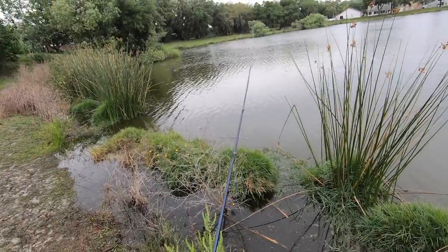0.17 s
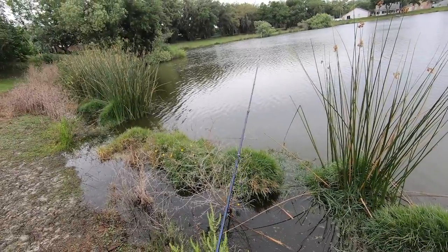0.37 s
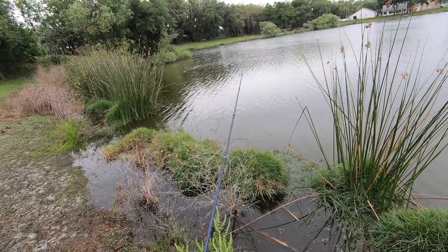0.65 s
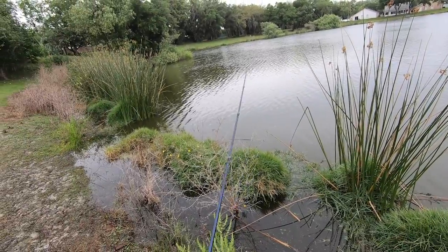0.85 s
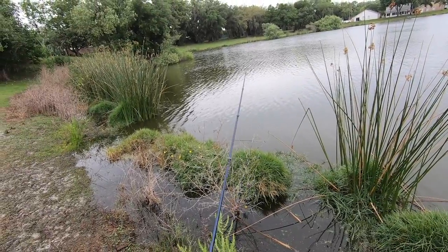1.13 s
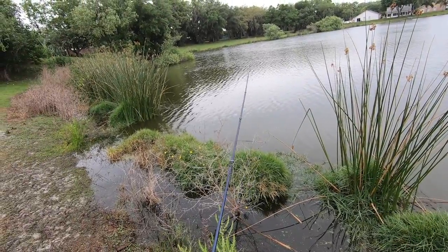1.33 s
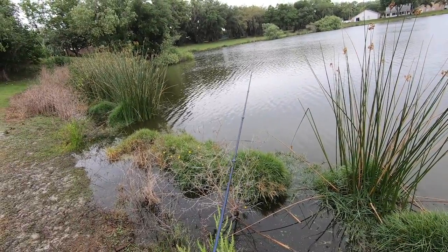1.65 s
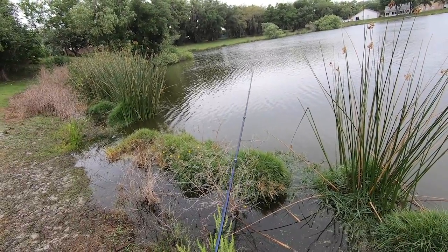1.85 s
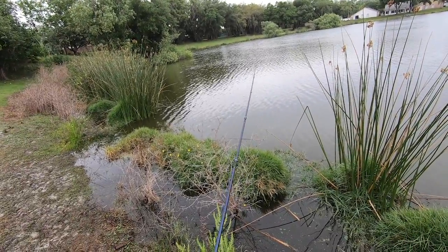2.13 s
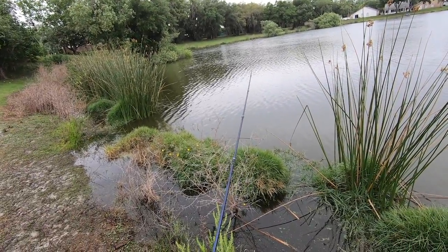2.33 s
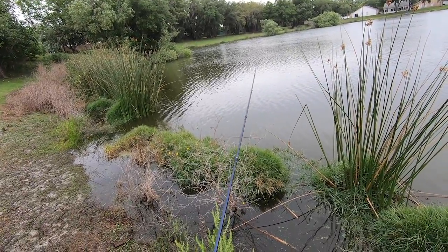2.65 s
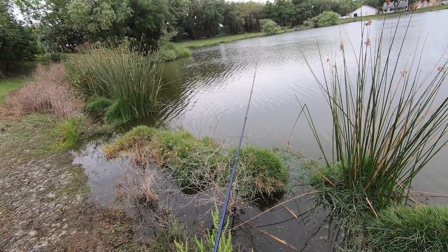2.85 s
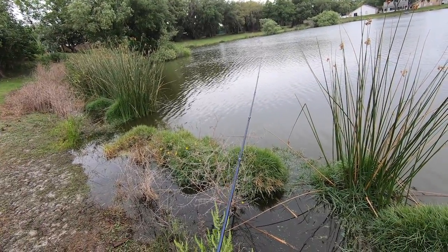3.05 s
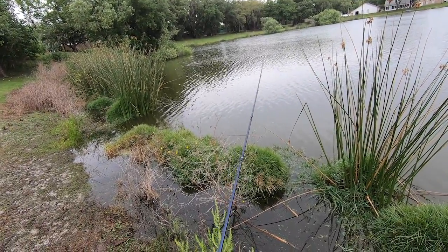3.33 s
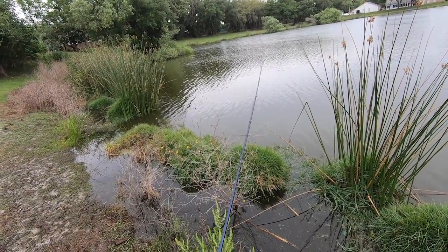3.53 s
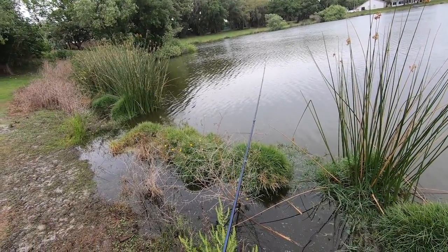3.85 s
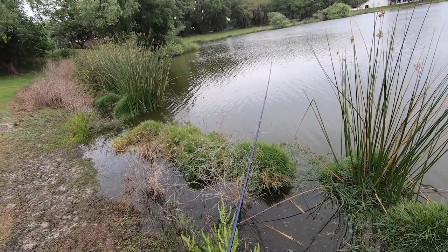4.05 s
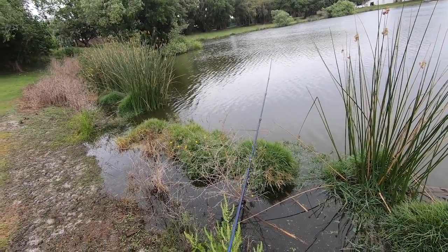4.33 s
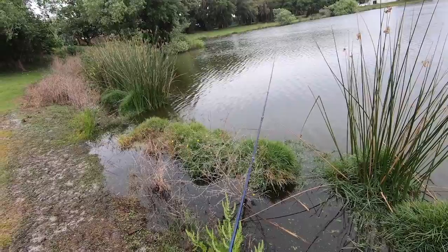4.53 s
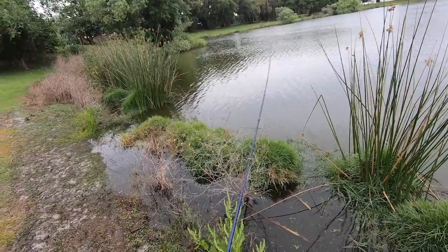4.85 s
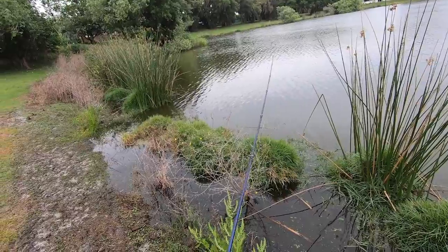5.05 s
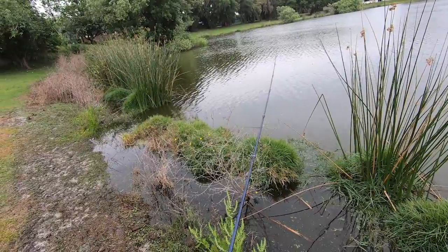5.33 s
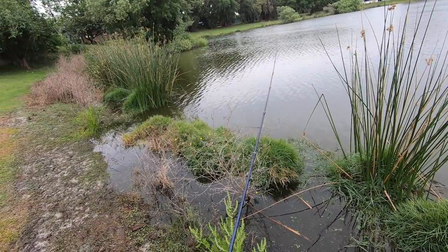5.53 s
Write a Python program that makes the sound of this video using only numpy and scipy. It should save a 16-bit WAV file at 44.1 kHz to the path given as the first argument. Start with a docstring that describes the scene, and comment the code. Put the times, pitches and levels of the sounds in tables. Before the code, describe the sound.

Outdoors at a quiet pond, a dull wash of breeze in trees lies over a faint distant engine. A cricket trills in regular short pulses throughout, above a very faint insect chorus. Small birds give slurred chirps, thin high whistles and quick twitters, mostly in the first four seconds. Midway a low gust buffets the open stereo microphone, heavier on the left, then fades, leaving breeze, engine rumble and cricket.

```python
"""The bank of a pond on a breezy day: a far engine drones under the wash of air in the trees.
One gust buffets the microphone, mostly its left port; a cricket trills steadily in the grass.
Small birds whistle and twitter around the water, and dry reeds tick now and then. Wind, leaves
and far calls are filtered noise, the engine harmonics plus noise, near birds and cricket sines."""
import sys
import numpy as np
from scipy import signal
from scipy.fft import rfft, irfft, next_fast_len
from scipy.io import wavfile
from scipy.ndimage import map_coordinates

SR = 44100
rng = np.random.default_rng(int(sys.argv[2]) if len(sys.argv) > 2 else 0)


def transcribe(u):
    """Save the signal u as a 16-bit wav file named by the first command-line argument.

    u: samples, shape (n,) or (channels, n), limited to [-1, 1]; the rate is SR.
    q: integer samples, one column per channel.
    """
    v = np.clip(np.atleast_2d(u).T, -1, 1)
    q = np.round(v * 32767).astype(np.int16)
    wavfile.write(sys.argv[1], SR, q)


N = 250488

# In every table, side/dB is the left minus right level difference.
# wind spectrum: [f/Hz, density/dB per Hz]
WIND_SPECTRUM = [(10, -17), (18, -6.5), (28, 0.5), (50, -2), (80, -6), (130, -16.5), (200, -23.5),
                 (350, -46), (700, -58.5)]
# puffs that make up the gust: [t/s, length/s, level/dB, side/dB]
GUST_PUFFS = [(2.672, 0.55, -36.5, 1.5), (3.326, 0.16, -23, 1.5), (3.744, .33, -31, 9),
              (4.299, 0.05, -35, 13)]
PUFF_ATTACK_S, PUFF_RELEASE_DB_PER_S, CALM_DB = 0.064, 81, -52

# far engine, whose drone gives way to rumble: [t/s, rumble gain/dB, exhaust drone gain/dB]
ENGINE_LEVELS = [(0, -40, -36.3), (2.4, -39.5, -38), (2.9, -36, -42), (5.68, -37, -44.5)]
FIRING_HZ = 31.59
# engine lines: [multiple of the firing rate, level/dB against its band]
RUMBLE_LINES = [(2, -7), (3, -14.5)]
# [multiple of the firing rate, level/dB against its band]
DRONE_LINES = [(6, -14), (7, -11), (8, -11), (9, -17), (10, -20.5), (11.2, -25), (12.6, -27)]
# rumble noise spectrum: [f/Hz, density/dB per Hz]
RUMBLE_SPECTRUM = [(12, -32.5), (25, -11), (42, -1.5), (65, 3), (80, -0.5), (90, -7.5), (100, -0.5),
                   (115, -2), (135, -4), (160, -10.5), (220, -21.5), (400, -52.5)]
# drone noise spectrum: [f/Hz, density/dB per Hz]
DRONE_SPECTRUM = [(100, -19), (160, -0.5), (200, 2), (260, -1), (290, -2), (335, -12.5), (420, -16),
                  (700, -31.5)]

# breeze in the trees, before the gains in trees(): [t/s, wash level/dB, leaf hiss level/dB]
BREEZE_LEVELS = [(0.0, -48, -75.5), (0.3, -47.5, -78), (1.93, -48.5, -80), (3.99, -49.5, -78),
                 (4.26, -50, -79), (5.68, -48.5, -76.5)]
# wash spectrum: [f/Hz, density/dB per Hz]
WASH_SPECTRUM = [(300, 0.5), (370, -1), (450, -2.5), (600, -3), (800, -2), (1120, -4.5), (1450, -9),
                 (1950, -15), (2400, -19), (3100, -20), (4000, -25), (5000, -28)]
# leaf hiss spectrum: [f/Hz, density/dB per Hz]
LEAF_SPECTRUM = [(2500, -14), (3500, -1), (4700, 1), (6200, 2), (7500, -1.5), (8300, -1.5), (9600, 0.5),
                 (10300, -6), (11000, -11.5), (12000, -25)]
# phase by which the left port leads: [f/Hz, phase/rad]
PORT_LEAD = [(300, 0), (550, -1), (780, 0), (1120, -0.3), (1500, 0.17), (2200, 1), (4000, 0)]
# correlation between the ports: [f/Hz, likeness -1 to 1]
PORT_LIKENESS = [(300, 0.92), (600, 0.87), (1060, 0.24), (1900, 0.59), (3300, 0.7), (5900, -0.066),
                 (10500, -0.22)]
# level difference between the ports: [f/Hz, side/dB]
PORT_BALANCE = [(300, -0.5), (600, -3.5), (1000, -10.5), (1400, -9.5), (1900, -4), (3300, -1.5), (4500, 0),
                (7500, 0.5), (9500, 5), (11000, 1.5)]

# the cricket's tempo, hurrying once: [t/s, chirps per s]
CRICKET_TEMPO = [(0, 4.44), (1.3, 4.46), (1.75, 4.68), (2.5, 4.37), (5.68, 4.36)]
FIRST_CHIRP_S, CHIRP_S, CHIRP_DB = -0.015, 0.146, -61.5
# one wing stroke: Gaussian width as a share of its cycle, and fall in pitch over the cycle
STROKE_WIDTH, STROKE_SWEEP_HZ = 0.33, 650

# slurred bird notes, the row at 0.784 s being a softer echo of the long falling whistle at 0.774 s; a positive
# bend glides late, a negative one early: [t/s, length/s, first f/Hz, last f/Hz, bend, level/dB, side/dB,
# distance 0-1]
SLURRED_NOTES = [ (0.182, .058, 4040, 3100, .1, -64, -13, .4), (.21, .016, 7300, 6650, -1.1, -68, -5, .2),
                 (.314, .092, 4070, 3000, -.5, -66, 1, .4), (0.784, .052, 4020, 3250, -1, -69, -1, .5),
                 (0.774, .245, 4930, 2180, -1.3, -64.5, 3, .35),
                 (1.351, 0.086, 3750, 2920, -0.5, -69, 2, .35), (1.869, .095, 3710, 3000, 1.5, -62, 0, .45),
                 (1.98, .094, 2990, 2850, -2, -66, 0, .55), (2.19, .105, 3710, 3000, 1.5, -60.5, 2, 0.2),
                 (2.326, 0.065, 3790, 2920, 0.6, -53.5, -17.5, .2),
                 (2.631, 0.11, 2900, 3320, -4, -61, -1, 0.41),
                 (2.937, .12, 3100, 3480, 3.5, -60.5, -1, 0.3)]
# runs of arched pips; their tops lie alternately below and above the centre:
# [t/s, length/s, interval/s, centre of tops f/Hz, level/dB, distance 0-1]
TWITTER_RUNS = [ (0.4, .115, .033, 7570, -69, .2), (1.2, .115, .033, 7150, -79.5, 0.7),
                (1.478, .115, .033, 7450, -77, .7), (2.212, .14, .031, 7250, -74, 0.5),
                (2.603, .25, .055, 7340, -60.5, 0.3), (3.04, .215, .033, 7450, -78, .8),
                (3.32, .18, .033, 7100, -79, .9), (3.609, .15, .033, 7300, -75, .9),
                (4.219, .05, .033, 7900, -72.5, .9), (5.0, .115, .033, 7600, -81, .9)]
PIP_S, PIP_ARCH_HZ, PIP_SEESAW_HZ, TWITTER_SWELL_DB = 0.017, 580, 150, 8.5
# lead and relative level of the softer grace pip before each pip
GRACE_S, GRACE_DB = 0.018, -9
# thin whistles that scoop up to a held pitch:
# [t/s, length/s, held f/Hz, scoop depth/Hz, level/dB, distance 0-1]
WHISTLE_NOTES = [(.375, 0.17, 7010, 150, -70.5, 0.4), (2.114, 0.23, 6800, 450, -74, 0.6),
                 (3.408, 0.33, 6720, 450, -78, .6), (3.76, 0.22, 6870, 750, -67.5, 0.33)]
SCOOP_S = 0.033
# far calls, blurred by distance: [t/s, length/s, f/Hz, width/Hz, level/dB, side/dB]
BLURRED_CALLS = [(0.102, 0.7, 1136, 90, -53.5, -8), (0.152, 0.46, 3380, 1400, -63.5, -4.5),
                 (2.172, 0.39, 3280, 1100, -64.5, -4), (3.252, .2, 1060, 110, -59, -11),
                 (5.273, .24, 3900, 900, -70.5, -4)]

# dry reeds touching: [t/s, peak level/dB, side/dB]
REED_TICKS = [(.7223, -58, 5), (3.8053, -56, 0), (4.0971, -63, 6)]
# far insect chorus: [f/Hz, width/Hz, level/dB]
CHORUS_BANDS = [(5040, 230, -76.5), (5426, 210, -76), (5870, 180, -78.5)]
# scatter from the wooded bank: decay time, and level of the cricket's echo
BANK_T60_S, BANK_ECHO_DB = 0.55, -8
CUTOFF_HZ = 11200


def from_db(db):
    """Amplitude gain is ten to the power of a twentieth of the decibels."""
    return 10 ** (np.asarray(db) / 20)


def rms_one(x):
    """Normalization divides a signal by its root mean square."""
    return x / np.sqrt(np.mean(x ** 2) + 1e-20)


def in_time(rows):
    """Linear interpolation gives each column of a curve at every sample."""
    s, *columns = np.transpose(rows)
    return [np.interp(np.arange(N) / SR, s, c) for c in columns]


def at_hz(points, hz):
    """Interpolation along logarithmic frequency reads a spectrum."""
    known_hz, values = np.transpose(points)
    return np.interp(np.log(hz + 1e-9), np.log(known_hz), values)


def pan(side_db):
    """A level difference is split evenly into left and right gains."""
    return from_db(np.array([[0.5], [-0.5]]) * side_db)


def drift(rate):
    """Slow random fluctuation of unit rms: a spline through 2 * rate random knots per second."""
    knots = rng.standard_normal(4096)
    position = np.arange(N) / SR * 2 * rate
    return rms_one(map_coordinates(knots, [position], order=3, mode="wrap"))


def fade(u, edge):
    """A sine-shaped envelope rises and falls as u runs from 0 to 1."""
    return np.sin(np.pi / 2 * np.clip(np.minimum(u, 1 - u) / edge, 0, 1))


def progress(length):
    """Normalized time runs from 0 to 1 over a length in seconds."""
    return np.linspace(0, 1, max(int(length * SR), 2))


def add(out, s, sound):
    """Superposition: mix a stereo sound in at a time, trimmed to the scene."""
    at = round(s * SR)
    first, last = max(at, 0), min(at + sound.shape[-1], N)
    out[:, first:last] += sound[:, first - at:last - at]


def stereo_noise(spectrum, likeness, side_db=None, lead=None):
    """Partial coherence: shared and opposed noise give two coloured ports, whose mean has rms 1."""
    size = next_fast_len(N)
    hz = np.arange(size // 2 + 1) * SR / size
    mid, side = rfft(rng.standard_normal((2, size)))
    alike = np.clip(at_hz(likeness, hz) if np.ndim(likeness) else likeness, -1, 1)
    ports = np.sqrt(1 + alike) * mid + np.sqrt(1 - alike) * side * [[1], [-1]]
    if lead:
        ports[0] *= np.exp(1j * at_hz(lead, hz))
    # roll off beyond both ends of the spectrum
    low_pass = 1 / (1 + (hz / spectrum[-1][0]) ** 8)
    high_pass = 1 / (1 + (spectrum[0][0] / (hz + 1)) ** 8)
    colour = low_pass * high_pass * from_db(at_hz(spectrum, hz))
    balance = pan(at_hz(side_db, hz) if side_db else 0)
    noise = irfft(ports * colour * balance, size)[:, :N]
    return noise / np.std(noise.mean(axis=0))


def band(x, hz, width_hz):
    """A resonance applied twice has steeper skirts."""
    b, a = signal.iirpeak(hz, hz / width_hz, fs=SR)
    return signal.lfilter(b, a, signal.lfilter(b, a, x))


def wind(lumpy_db=2.5, eddy_rate=6):
    """Turbulent pressure: puffs swell, hold and die away, with uneven eddies at each port."""
    t, power = np.arange(N) / SR, from_db(CALM_DB) ** 2
    for s, length, db, side_db in GUST_PUFFS:
        attack = np.clip((t - s) / PUFF_ATTACK_S, 0, 1)
        release_db = PUFF_RELEASE_DB_PER_S * np.maximum(t - s - length, 0)
        power = power + (attack * from_db(db - release_db) * pan(side_db)) ** 2
    lumps_db = lumpy_db * np.array([drift(eddy_rate), drift(eddy_rate)])
    buffeting = rms_one(stereo_noise(WIND_SPECTRUM, likeness=-0.15))
    return np.sqrt(power) * from_db(lumps_db) * buffeting


def engine(wander=0.01225, fading_db=2.5, rumble_noise_db=-1.0, drone_noise_db=-5.0):
    """Multiples of a wandering firing rate fade in and out on their long way, amid rumble and drone noise."""
    rumble_db, drone_db = in_time(ENGINE_LEVELS)
    phase = 2 * np.pi * np.cumsum(FIRING_HZ * (1 + wander * drift(3))) / SR

    def lines(orders):
        """Additive synthesis sums sines of random phase and fluctuating level."""
        total = np.zeros(N)
        for order, db in orders:
            level = np.sqrt(2) * from_db(db + fading_db * drift(3))
            total += level * np.sin(order * phase + rng.uniform(0, 2 * np.pi))
        return total

    rumble_noise = from_db(rumble_noise_db) * stereo_noise(RUMBLE_SPECTRUM, likeness=1.0)
    drone_noise = from_db(drone_noise_db) * stereo_noise(DRONE_SPECTRUM, likeness=0.92)
    rumble = lines(RUMBLE_LINES) + rumble_noise
    drone = lines(DRONE_LINES) + drone_noise
    return from_db(rumble_db) * rumble + from_db(drone_db) * drone


def trees(wash_gain_db=1.0, hiss_gain_db=7.5, flutter_db=0.5):
    """Broadband flow noise: a dull wash from across the water and a faint hiss of near leaves."""
    wash_db, hiss_db = in_time(BREEZE_LEVELS)
    wash_level = from_db(wash_db + wash_gain_db + flutter_db * drift(6))
    hiss_level = from_db(hiss_db + hiss_gain_db + flutter_db * drift(13))
    wash = stereo_noise(WASH_SPECTRUM, PORT_LIKENESS, PORT_BALANCE, PORT_LEAD)
    hiss = stereo_noise(LEAF_SPECTRUM, PORT_LIKENESS, PORT_BALANCE)
    return wash_level * wash + hiss_level * hiss


def chirp_times():
    """Accumulated phase: a chirp starts each time the cricket's beat comes round."""
    beats = np.cumsum(in_time(CRICKET_TEMPO)[0]) / SR
    return FIRST_CHIRP_S + np.searchsorted(beats, np.arange(beats[-1])) / SR


def cricket(stroke_hz=72, wing_hz=5415, ground_s=0.00222, ground_db=-5, side_db=2.5,
            port_phase=1.5, uneven_db=0.5, chirp_spread_db=1.1):
    """Stridulation: each wing stroke is a short falling tone; ground interference favours mid-sweep."""
    out, starts = np.zeros((2, N)), chirp_times()
    t = np.arange(int(CHIRP_S * SR)) / SR
    stroke = (t * stroke_hz).astype(int)
    u = t * stroke_hz % 1 - 0.5
    strength = np.exp(-(u / STROKE_WIDTH) ** 2 / 2) * np.sqrt(np.cos(np.pi * u).clip(0))
    # a whole number of wing cycles keeps the ground echo in phase at mid-sweep
    ground_delay = round(ground_s * wing_hz) / wing_hz
    for s, chance in zip(starts, rng.standard_normal((len(starts), 2, 32))):
        hz = wing_hz * (1 + 0.0051 * chance[0, stroke]) - STROKE_SWEEP_HZ * u
        phase = 2 * np.pi * np.cumsum(hz) / SR
        chirp_db = CHIRP_DB + chirp_spread_db * chance[1, -1] + uneven_db * chance[1, stroke]
        level = from_db(chirp_db) * fade(t / CHIRP_S, edge=0.055)
        chirp = strength * level * np.sin(phase + [[port_phase], [0]]) * pan(side_db)
        add(out, s, chirp)
        add(out, s + ground_delay, chirp * from_db(ground_db))
    return out + from_db(BANK_ECHO_DB) * bank_echo(out)


def sing(notes, edge, warble_hz, warble_db, warble_rate, echo_db):
    """Frequency-modulated tones with overtones; the farther the bird, the more it quivers and echoes."""
    # notes: (t/s, pitch curve/Hz, level/dB, side/dB, octave level/dB, distance 0-1)
    direct, scattered = np.zeros((2, 2, N))
    quiver, flutter = drift(warble_rate), drift(warble_rate)
    for s, hz, db, side_db, octave_db, distance in notes:
        now = (int(s * SR) + np.arange(len(hz))) % N
        phase = 2 * np.pi * np.cumsum(hz + distance * warble_hz * quiver[now]) / SR
        overtones = np.sin(2 * phase) + np.sin(3 * phase) / np.pi
        tone = np.sin(phase) + from_db(octave_db) * overtones
        envelope = fade(np.linspace(0, 1, len(hz)), edge)
        level = envelope * from_db(db + distance * warble_db * flutter[now])
        note = np.sqrt(2) * tone * level * pan(side_db)
        add(direct, s, note)
        add(scattered, s, distance * note)
    return direct + from_db(echo_db) * bank_echo(scattered)


def slurs(onset_hz=500, onset_s=0.005, overtone_db=-20):
    """Pitch glide: each note flicks up, then follows a bent line; softer notes are purer."""
    notes, loudest_db = [], np.array(SLURRED_NOTES)[:, 5].max()
    for s, length, first, last, bend, db, side_db, distance in SLURRED_NOTES:
        u = progress(length)
        glide = np.cumsum(np.exp(bend * u))
        flick = onset_hz * np.exp(-u * length / onset_s)
        hz = first + (last - first) * glide / glide[-1] - flick
        notes.append((s, hz, db, side_db, overtone_db + db - loudest_db, distance))
    return sing(notes, edge=0.22, warble_hz=90, warble_db=6.5, warble_rate=70, echo_db=2.5)


def twitters(side_db=-0.6, octave_db=-40):
    """Alternating pitch: graced pips seesaw between low and high, loudest in the middle of the run."""
    notes, arch = [], PIP_ARCH_HZ * (2 * progress(PIP_S) - 1) ** 2
    for s, length, gap, centre_hz, db, distance in TWITTER_RUNS:
        starts = np.arange(0, length, gap)
        for k, start in enumerate(starts):
            hz = centre_hz - (-1) ** k * PIP_SEESAW_HZ - arch
            swell = np.sin(np.pi * (k + 0.5) / len(starts))
            pip_db = db - TWITTER_SWELL_DB * (1 - swell)
            at = s + start
            notes.append((at, hz, pip_db, side_db, octave_db, distance))
            notes.append((at - GRACE_S, hz, pip_db + GRACE_DB, side_db, octave_db, distance))
    return sing(notes, edge=0.23, warble_hz=110, warble_db=6, warble_rate=70, echo_db=5.0)


def whistles(side_db=-4.0, octave_db=-40):
    """Exponential approach: a thin, high note slides up and settles on its pitch."""
    notes = []
    for s, length, held_hz, scoop_hz, db, distance in WHISTLE_NOTES:
        hz = held_hz - scoop_hz * np.exp(-progress(length) * length / SCOOP_S)
        notes.append((s, hz, db, side_db, octave_db, distance))
    return sing(notes, edge=0.065, warble_hz=75, warble_db=6, warble_rate=70, echo_db=2.5)


def far_calls(twitter_db=-0.5, twitter_rate=30, peak_shift=0.73):
    """Scattering over distance smears calls into flickering bands that swell quickly and trail off."""
    out, flicker = np.zeros((2, N)), from_db(twitter_db * drift(twitter_rate))
    white = rng.standard_normal((3, N))
    for s, length, hz, width_hz, db, side_db in BLURRED_CALLS:
        now = (int(s * SR) + np.arange(int(length * SR))) % N
        swell = fade(np.linspace(0, 1, len(now)) ** peak_shift, edge=0.38)
        # one noise is common to both ports, one is private to each
        noise = white[0, now] + white[1:, now]
        call = band(noise, hz, width_hz) * flicker[now] * swell
        add(out, s, rms_one(call) * from_db(db) * pan(side_db))
    return out


def reeds(decay_s=0.0044, stem_hz=8500, width_hz=6000):
    """Impact excitation: dry stems touch with a tiny, bright, decaying tick."""
    out, t = np.zeros((2, N)), np.arange(SR // 20) / SR
    for s, db, side_db in REED_TICKS:
        impact = rng.standard_normal((2, len(t))) * np.exp(-t / decay_s)
        tick = band(impact, stem_hz, width_hz)
        add(out, s, tick / np.abs(tick).max() * from_db(db) * pan(side_db))
    return out


def far_insects():
    """Incoherent summation: many distant insects merge into faint steady bands."""
    out = np.zeros((2, N))
    for hz, width_hz, db in CHORUS_BANDS:
        out += from_db(db) * rms_one(band(rng.standard_normal((2, N)), hz, width_hz))
    return out


def bank_echo(x):
    """Diffuse scattering: trunks and reeds return a thin, exponentially dying tail."""
    t = np.arange(SR) / SR
    build_up = 1 - np.exp(-t / 0.018)
    tail = rng.standard_normal((2, SR)) * from_db(-60 * t / BANK_T60_S) * build_up
    return signal.fftconvolve(x.mean(axis=0)[None], rms_one(tail) / np.sqrt(SR), axes=1)[:, :N]


def scene():
    """Superposition of animals and reeds over engine, trees and wind."""
    birds = slurs() + whistles() + twitters() + far_calls()
    return birds + cricket() + far_insects() + reeds() + trees() + engine() + wind()


def record(dry):
    """Band limitation: an elliptic low-pass cuts the top steeply."""
    low_pass = signal.ellip(10, 0.1, 80, CUTOFF_HZ, fs=SR, output="sos")
    return signal.sosfilt(low_pass, dry)


dry = scene()
out = record(dry)
transcribe(out)
```